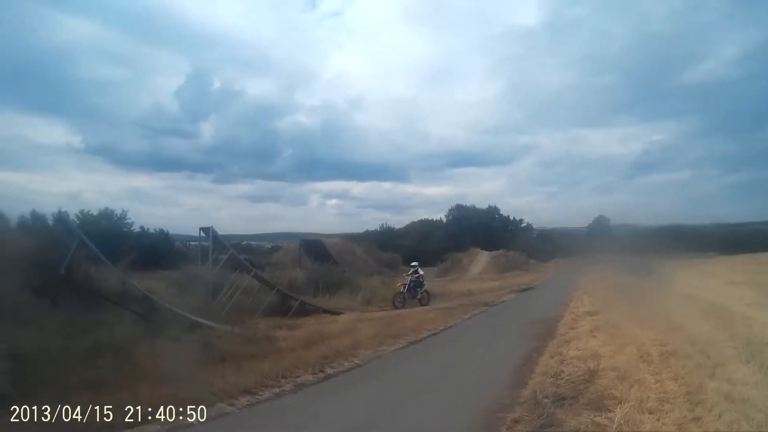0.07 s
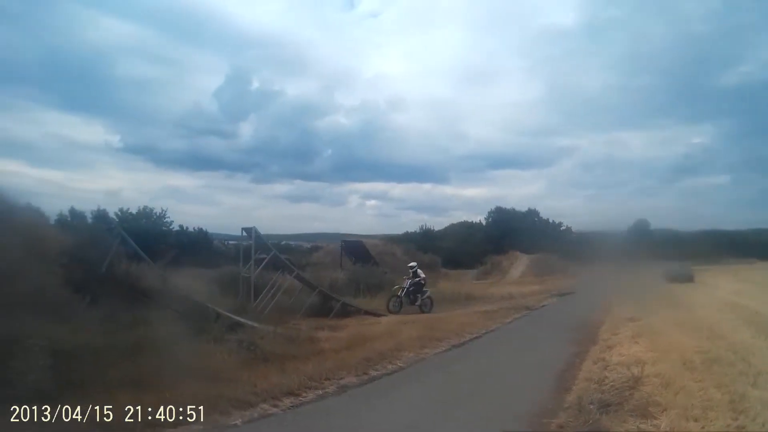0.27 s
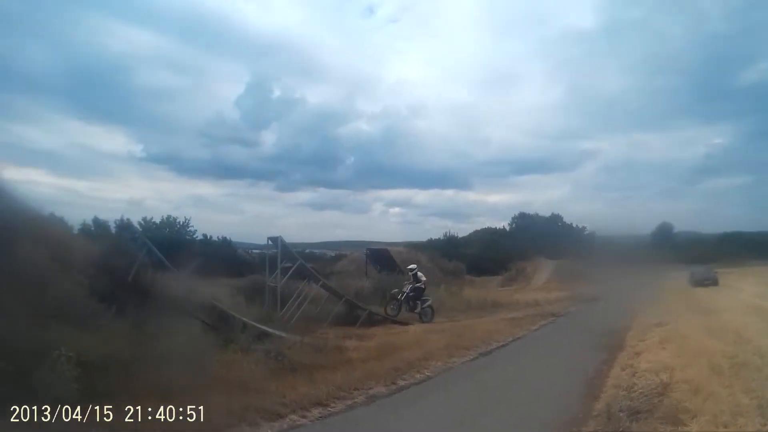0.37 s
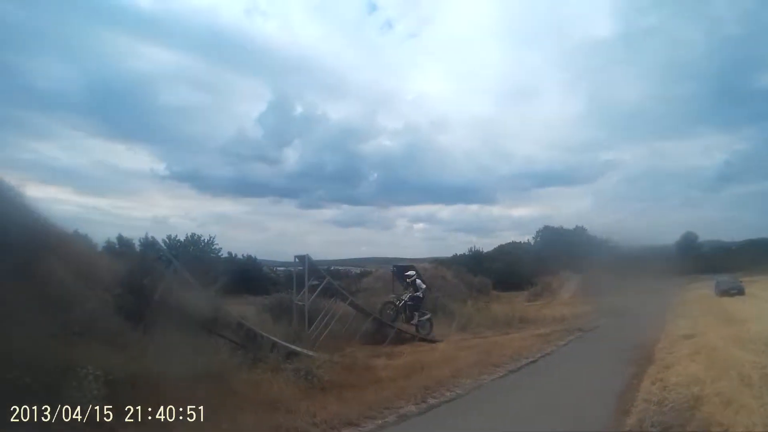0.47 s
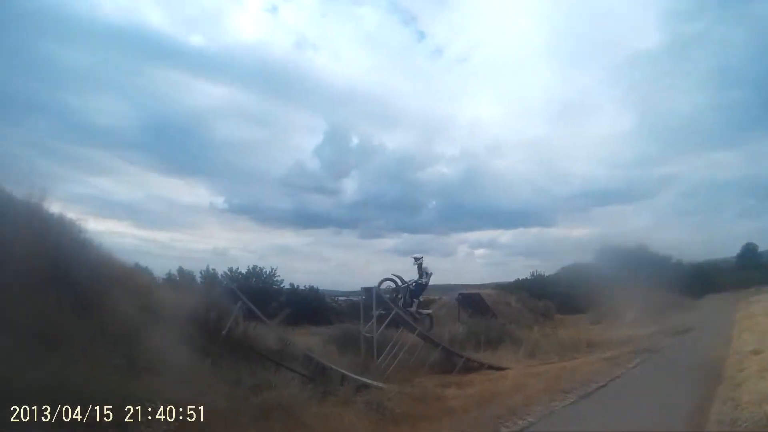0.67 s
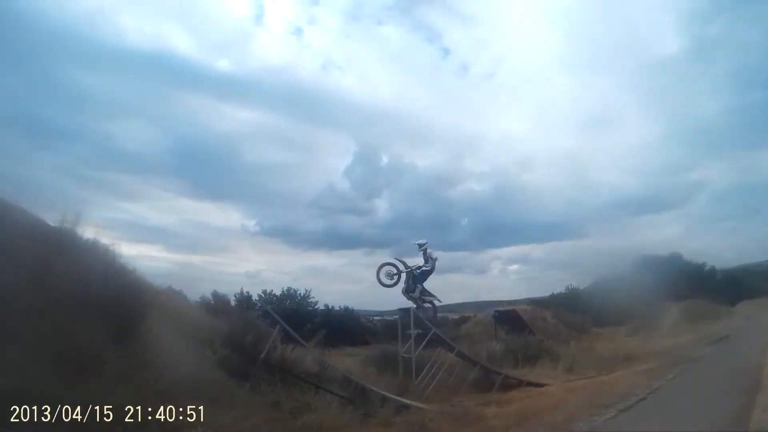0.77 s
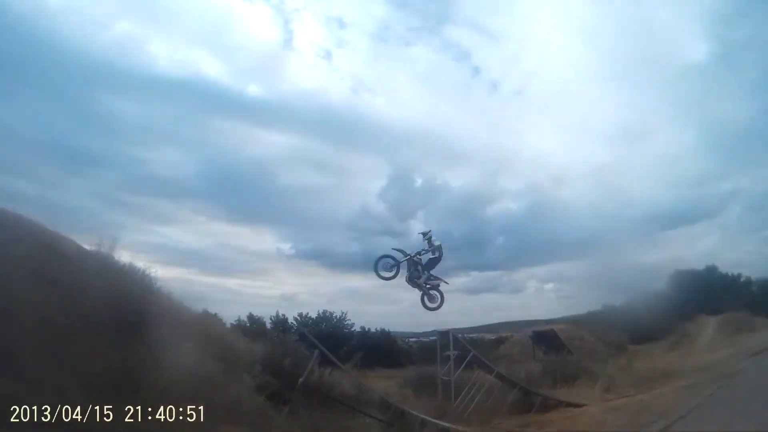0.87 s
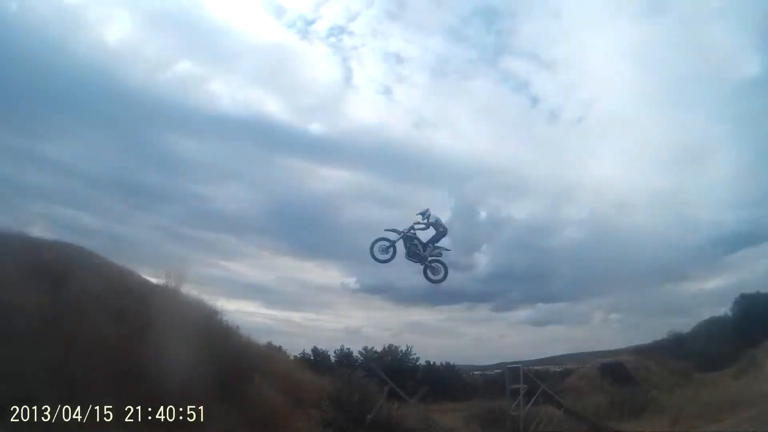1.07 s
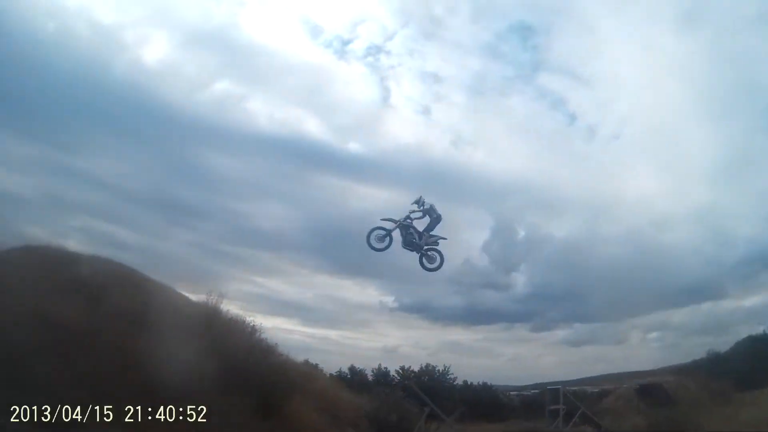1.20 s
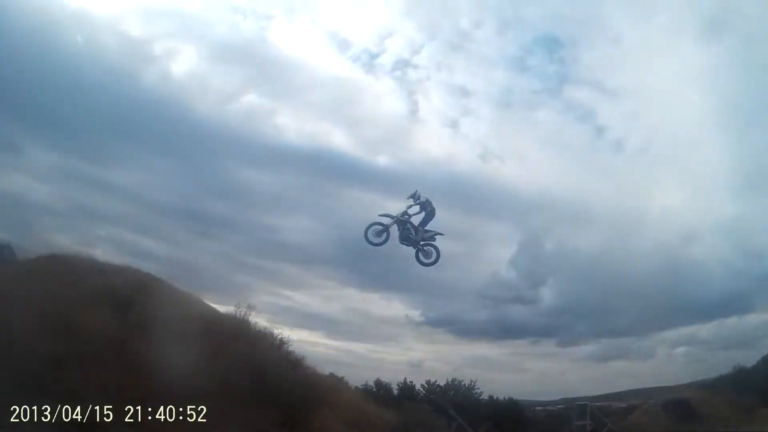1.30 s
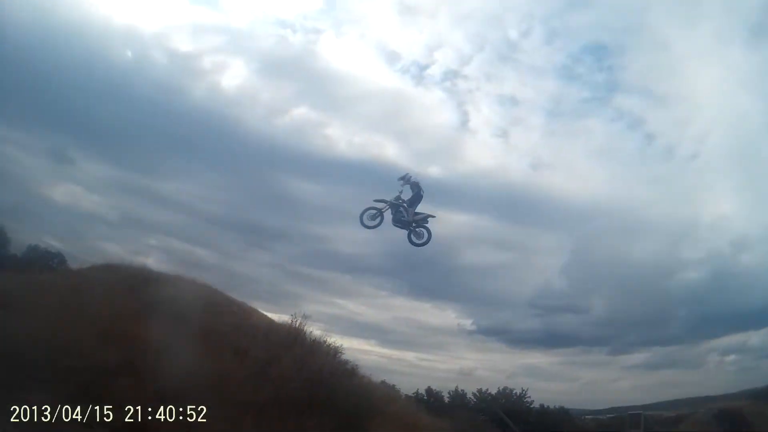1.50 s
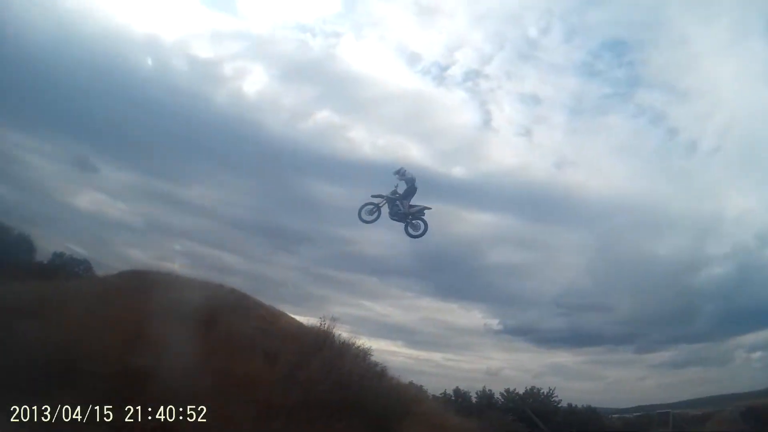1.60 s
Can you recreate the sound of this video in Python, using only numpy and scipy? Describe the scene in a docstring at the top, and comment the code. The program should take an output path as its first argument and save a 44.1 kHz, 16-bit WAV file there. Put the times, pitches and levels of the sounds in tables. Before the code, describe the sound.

A dirt bike revs up loudly, then drops to a soft, rasping putter in midair.

```python
"""On a dirt track, a one-cylinder bike runs up to a ramp on full throttle and jumps.
Every firing barks through the silencer. In the air the throttle is shut and the engine winds down
to soft thuds and a rasp, with one blip of throttle and three stray pops.
The ground sends everything back a second time, later and later as the bike climbs."""
import sys
import numpy as np
from scipy import signal
from scipy.fft import rfft, irfft, next_fast_len
from scipy.io import wavfile
from scipy.ndimage import uniform_filter1d, map_coordinates

SR = 44100
rng = np.random.default_rng(int(sys.argv[2]) if len(sys.argv) > 2 else 0)


def transcribe(u):
    """Save the signal u as a 16-bit wav file named by the first command-line argument.

    u: samples, shape (n,) or (channels, n), limited to [-1, 1]; the rate is SR.
    q: integer samples, one column per channel.
    """
    v = np.clip(np.atleast_2d(u).T, -1, 1)
    q = np.round(v * 32767).astype(np.int16)
    wavfile.write(sys.argv[1], SR, q)


N = 72765

SHUT_S, BLIP_START_S, BLIP_END_S = .815, 1.04, 1.16  # the throttle shuts, then opens briefly
# strength of the firings on the run-up (all table levels are relative): t/s, bark/dB, treble/dB, mids/dB
RUN_UP = [(0, -44.5, -50.5, -58), (0.11, -46.5, -56.9, -55), (0.17, -37, -47.5, -69),
          (0.268, -27.5, -36, -44), (0.35, -20.5, -31.5, -50), (0.45, -22, -27.5, -42),
          (0.51, -21.5, -24, -38.5), (0.59, -25.5, -22.5, -36), (0.66, -26.5, -20, -32),
          (0.718, -31, -22.5, -32), (0.76, -30.5, -28, -40.8), (0.798, -24, -30.5, -50.5),
          (0.83, -38, -43, -16)]


def bark(firings, sizes):
    """Firings under throttle and stray pops ring the silencer; higher bands hold more churning gas."""
    stray_pops = [(1.0111, -30.5, -2.5), (1.1345, -48, -7.5), (1.4006, -44, 2.5)]  # t/s, level/dB, treble against the bark/dB
    sizzle_level = [(0, -13), (.2, -16.5), (.38, -8.5), (.52, -17), (.66, -15), (.8, -19), (1.1, -38)]  # sizzle against the treble: t/s, level/dB
    mids_tone = [(200, -37.5), (330, 2), (440, -3.5), (600, 1), (800, 0), (950, 7), (1300, -39)]  # low middle of a firing's sound: f/Hz, level/dB
    boom_tone = [(150, -32), (280, -1), (380, 9), (470, 4), (570, -8), (740, 7), (1000, -29)]  # booms during the blip: f/Hz, level/dB
    treble_hz, sizzle_hz = 2177, 3780  # where these bands begin
    run = firings < SHUT_S
    blip = (firings > BLIP_START_S) & (firings < BLIP_END_S)
    pop_s, pop_db, pop_edge_db = np.transpose(stray_pops)
    run_s, bark_db, treble_db, mids_db = np.transpose(RUN_UP)

    def train(run_db, blip_db, pops_db, puff_share):
        gains = run * amp(np.interp(firings, run_s, run_db)) + blip * amp(blip_db)
        strengths = np.r_[sizes * gains, sizes.mean() * amp(pops_db)]
        return blasts(np.r_[firings, pop_s], strengths, puff_share)

    ring = silencer()
    low_band = ring * sweep() * passband("low", treble_hz) * passband("high", 610, order=2)
    treble_band = ring * passband("high", treble_hz) * passband("low", sizzle_hz)
    sizzle_band = ring * passband("high", sizzle_hz, order=8)
    treble_levels = treble_db, -42, pop_db + pop_edge_db  # run-up, blip, pops
    low = filtered(train(bark_db, -32, pop_db, puff_share=.02), low_band)
    treble = filtered(train(*treble_levels, puff_share=.22), treble_band)
    sizzle = filtered(train(*treble_levels, puff_share=.7), sizzle_band)
    sizzle *= amp(curves(sizzle_level)[0])
    mids = filtered(train(mids_db, -48, pop_db - 16, puff_share=0), colour(mids_tone))
    boom = filtered(pulses(firings, sizes * blip), colour(boom_tone))
    return amp(-3) * low + amp(-1) * (treble + sizzle) + amp(-2.5) * mids + amp(-47) * boom


def blasts(times, sizes, puff_share, puff_s=.0049):
    """Each firing is a sharp jump in pressure followed by a puff of churning gas."""
    front = pulses(times, sizes)
    decay = np.exp(-np.arange(SR // 20) / SR / puff_s)
    puff = signal.fftconvolve(front, decay / np.linalg.norm(decay))[:N] * rng.standard_normal(N)
    return np.sqrt(1 - puff_share) * front + np.sqrt(puff_share) * puff


def silencer():
    """The silencer rings at its own pitches, and sound bounces around inside the pipe."""
    ring_tones = [(961, 130, 0), (1284, 71, 4.5), (1568, 145.6, 4), (1927, 79, 6), (2235, 103, -4.5),
                  (2827, 119, -5), (3332, 138.5, -1.5), (3280, 750, -13), (4110, 67, -5.5),
                  (5780, 220, -18.5), (6310, 290, -22.5), (7680, 150, -24), (8320, 120, -23.5),
                  (11800, 530, -34)]  # f/Hz, width/Hz, level/dB
    pipe_echoes = [(.0012, -0.57), (.0026, 0.22), (.0033, 0.29)]  # delay/s, gain
    f = grid()
    ring = sum((-1) ** k * amp(db) * 1j * f * width / (hz * hz - f * f + 1j * f * width)
               for k, (hz, width, db) in enumerate(ring_tones))
    echoes = sum(gain * np.exp(-2j * np.pi * f * delay_s) for delay_s, gain in pipe_echoes)
    return ring * (1 + echoes)


def sweep():
    """Each bark slides upward, because its highest pitches leave the silencer last."""
    exit_delays = [(850, 0.33), (1250, 0), (1550, 0.59), (2000, 1.23)]  # f/Hz, delay/ms
    f = grid()
    delay_s = lookup(f, exit_delays) / 1000
    return np.exp(-2j * np.pi * np.cumsum(delay_s) * f[1])


def thuds(firings, sizes):
    """Each exhaust stroke on the run-up gives a low push of air."""
    thud_level = [(0, -56), (.15, -55), (.27, -45.5), (.36, -42), (.5, -41.5), (.68, -39), (.83, -52)]  # t/s, level/dB
    thud_tone = [(30, -72), (70, -15.5), (105, 1.5), (150, -2.5), (220, -9), (315, 11.5), (380, 1),
                 (480, -16), (900, -49)]  # f/Hz, level/dB
    gains = (firings < SHUT_S) * amp(.5 + lookup(firings, thud_level))
    return filtered(pulses(firings, sizes * gains), colour(thud_tone))


def coast(firings, sizes):
    """In the air the piston pumps soft thuds that ring the silencer, at first with gulps between."""
    thud_level = [(.83, -48.5), (.88, -42.5), (.99, -49), (1.08, -61), (1.18, -47.5), (1.3, -48.5),
                  (1.42, -54.5), (1.65, -70)]  # t/s, level/dB
    thud_tone = [(30, -17), (70, -17), (115, -15), (165, 3), (240, -5.5), (300, -1), (365, 0.5),
                 (460, -6.5), (560, -10), (740, -8.5), (1000, -20), (2000, -53.5)]  # f/Hz, level/dB
    lag_s, gulp_fade_s = .0025, .18
    unfired = (firings < BLIP_START_S) | (firings > BLIP_END_S)
    times = firings + lag_s * unfired  # unburnt gas leaves the cylinder late
    gains = sizes * (firings > SHUT_S) * amp(.5 + lookup(firings, thud_level))
    gulp = .64 * np.exp(-abs(firings - SHUT_S) / gulp_fade_s)
    gulp_times = times + np.gradient(firings) / 2  # air is sucked in half a cycle later
    strokes = pulses(times, gains) + pulses(gulp_times, gains * gulp)
    return filtered(strokes, colour(thud_tone)) + amp(1) * filtered(strokes, silencer())


def rasp(cycles, swing_db=2.5):
    """Gas and chain noise swells once each engine cycle, and part of it rings the silencer."""
    run_level = [(0, -56.5), (.15, -50), (.35, -36.5), (.55, -36.5), (.7, -32.5), (.8, -34)]  # under throttle: t/s, level/dB
    air_level = [(.86, -38), (.96, -40), (1.15, -40.5), (1.3, -42), (1.392, -45.5), (1.46, -53),
                 (1.55, -54.5), (1.65, -63)]  # in the air: t/s, level/dB
    rasp_tone = [(260, -42.5), (450, 0), (514, -23), (745, -1.5), (826, -3), (1710, 4.5), (2550, -10.5),
                 (3270, -4), (5180, -15.5), (15500, -29.5)]  # f/Hz, level/dB
    swell = unit(amp(swing_db * np.cos(2 * np.pi * cycles)))
    free, piped = swell * rng.standard_normal((2, N))
    noise = filtered(free, colour(rasp_tone)) + .32 * filtered(piped, silencer())
    level_db, = curves(np.vstack([run_level, air_level]))
    return unit(noise) * amp(level_db - .5)


def jet():
    """Escaping gas roars on the run-up, rising and falling with the treble of the firings."""
    roar_tone = [(900, -38), (2200, 11), (3300, -2), (5000, -12), (6000, -10), (12000, -16), (15000, -30)]  # f/Hz, level/dB
    treble_db = curves(RUN_UP)[1]
    throttle = uniform_filter1d(1.0 * (clock() < SHUT_S), size=900)
    return throttle * amp(treble_db - 20) * filtered(rng.standard_normal(N), colour(roar_tone))


def ground(x, dull_hz=4400):
    """A duller echo off the ground comes later and grows louder as the bike climbs."""
    echo_delay = [(0, 0.89), (.35, 0.43), (.52, 0.73), (.68, 1.35), (.8, 2.92), (.9, 3.2), (1.01, 5.1),
                  (1.15, 6.42), (1.33, 7.3), (1.6, 8.5)]  # t/s, delay/ms
    delay_ms, = curves(echo_delay)
    dulled = signal.lfilter(*signal.butter(1, dull_hz, fs=SR), x)
    echo = map_coordinates(dulled, [np.arange(N) - delay_ms * SR / 1000])
    return x + np.interp(delay_ms, [1, 5], [.19, .95]) * echo


def field(x, fade_s=.2):
    """The land around scatters back a short, weak tail of sound."""
    t = np.arange(SR // 2) / SR
    tail = rng.standard_normal(len(t)) * amp(-60 * t / fade_s) * (t > .004)
    return x + amp(-16) * signal.fftconvolve(x, tail / np.linalg.norm(tail))[:N]


def background(whine_hz=9400):
    """Still air, hiss and a faint electrical whine lie under everything."""
    air_tone = [(25, -10), (70, -1), (200, 7.5), (600, 1.5), (2000, -3.5), (5000, -20.5), (12000, -28.5),
                (15500, -10)]  # f/Hz, level/dB
    wander = np.cumsum(rng.normal(0, .031, N))
    whine = np.sqrt(2) * np.sin(2 * np.pi * whine_hz * clock() + wander)
    return amp(-51.5) * filtered(rng.standard_normal(N), colour(air_tone)) + amp(-75.5) * whine


def amp(db):
    """Turn decibels into a gain."""
    return 10 ** (np.asarray(db) / 20)


def unit(x):
    """Scale x to an average power of one."""
    return x / np.sqrt(np.mean(x ** 2) + 1e-20)


def clock():
    """The time of each sample in seconds."""
    return np.arange(N) / SR


def lookup(at, rows):
    """Read between the rows of a two-column table."""
    return np.interp(at, *np.transpose(rows))


def curves(rows):
    """One value per sample for each column after the time."""
    times, *columns = np.transpose(rows)
    return [np.interp(clock(), times, column) for column in columns]


def grid():
    """The frequencies at which every filter is given."""
    return np.fft.rfftfreq(2 * next_fast_len(N), 1 / SR)


def filtered(x, response):
    """Send x through a filter, scaled so that white noise would keep its power."""
    size = 2 * (len(response) - 1)
    return irfft(rfft(x, size) * response / np.sqrt(np.mean(abs(response) ** 2)))[:N]


def colour(points):
    """A filter drawn through points of f/Hz, level/dB."""
    hz, db = np.transpose(points)
    gain = amp(np.interp(np.log(grid() + 1), np.log(hz), db))
    cepstrum = irfft(np.log(gain))
    half = len(cepstrum) // 2
    cepstrum[1:half] *= 2
    cepstrum[half + 1:] = 0  # so it rings only after a pulse, never before
    return np.exp(rfft(cepstrum))


def passband(kind, hz, order=4):
    """A filter that lets through the "low" or the "high" side of hz."""
    sections = signal.butter(order, hz, kind, fs=SR, output="sos")
    return signal.sosfreqz(sections, grid(), fs=SR)[1]


def pulses(times, sizes, reach=8):
    """Sharp clicks that can fall between samples."""
    at = times[:, None] * SR
    index = np.floor(at).astype(int) + np.arange(1 - reach, reach + 1)
    shape = np.sinc(index - at) * np.cos(np.pi * (index - at) / (2 * reach)) ** 2
    return np.bincount(np.clip(index, 0, N).ravel(), (shape * sizes[:, None]).ravel(), N + 1)[:N]


def scene():
    """One engine speed sets the beat of the barks, the thuds and the rasp."""
    engine_speed = [(0.0, 50.0), (0.06, 54.0), (0.22, 57.9), (0.34, 63.6), (0.42, 70.3), (0.46, 75.3),
                    (0.51, 69.5), (0.6, 73.9), (0.69, 75.8), (0.78, 73.3), (0.9, 58.1), (0.98, 54.4),
                    (1.04, 54.2), (1.14, 61.1), (1.19, 56.4), (1.29, 53.1), (1.42, 46.0), (1.65, 38.1)]  # t/s, firing rate/Hz
    rate, = curves(engine_speed)
    cycles = np.cumsum(rate) / SR - .22  # the first firing comes .22 of a cycle in
    firings = np.interp(np.arange(int(cycles[-1]) + 1), cycles, clock())
    uneven_db = .35 * rng.standard_normal(N)[:len(firings)]
    sizes = np.sqrt(SR / np.interp(firings, clock(), rate)) * amp(uneven_db)  # same power at any speed
    bike = bark(firings, sizes) + thuds(firings, sizes) + coast(firings, sizes) + rasp(cycles) + jet()
    return (field(ground(bike)) + background())[None]


def record(dry):
    """The microphone softens the highest treble and keeps nothing above its limit."""
    soften_hz, limit_hz = 12700, 15700
    top = amp(np.interp(grid(), [soften_hz, limit_hz], [0, -13])) * (grid() < limit_hz)
    return irfft(rfft(dry, 2 * next_fast_len(N)) * top)[:, :N]


dry = scene()
out = record(dry)
transcribe(out)
```